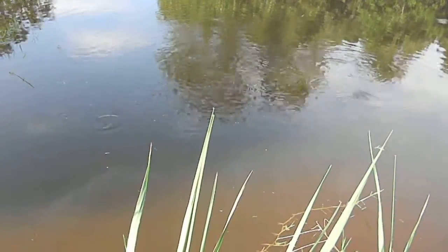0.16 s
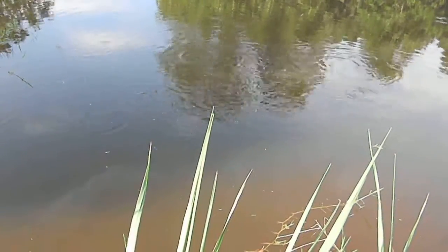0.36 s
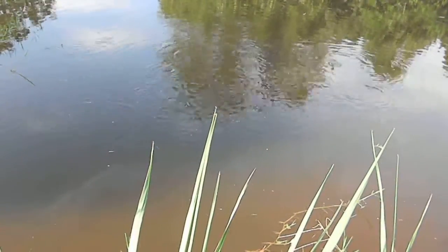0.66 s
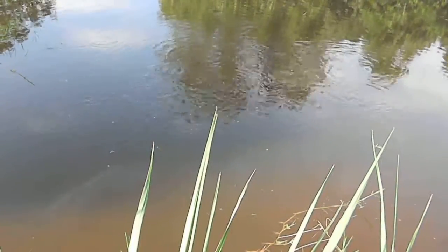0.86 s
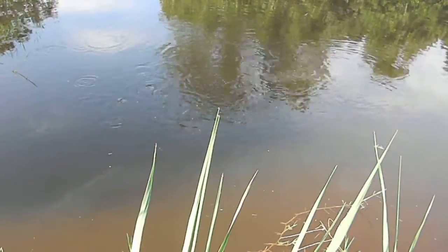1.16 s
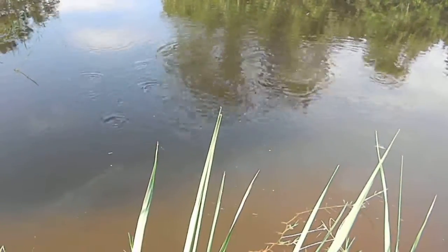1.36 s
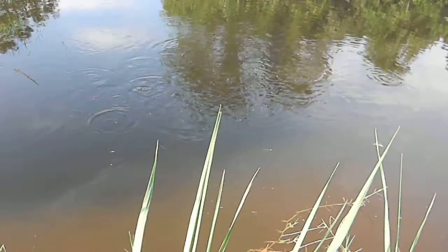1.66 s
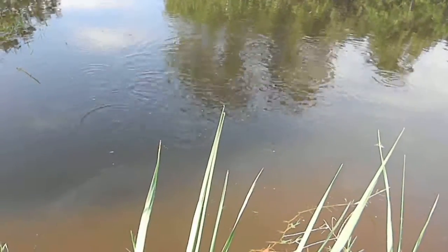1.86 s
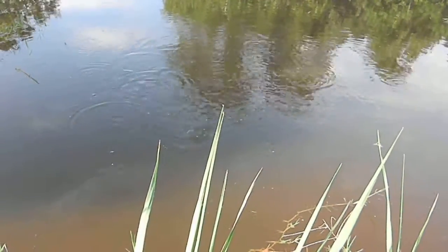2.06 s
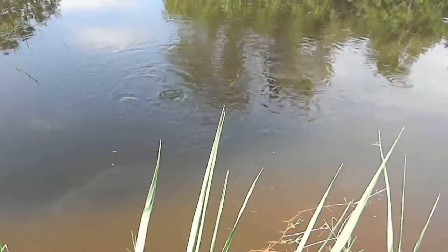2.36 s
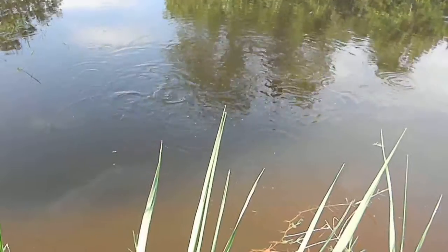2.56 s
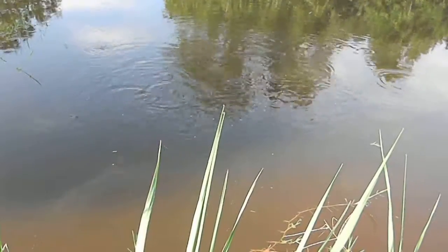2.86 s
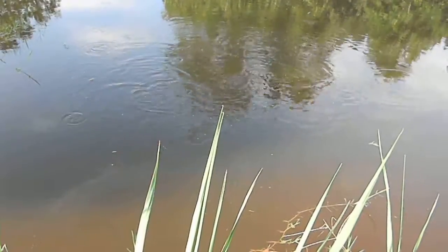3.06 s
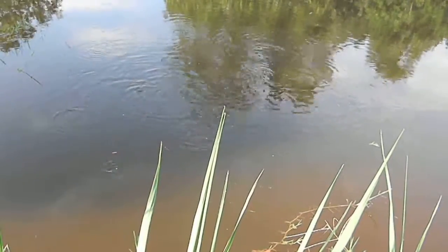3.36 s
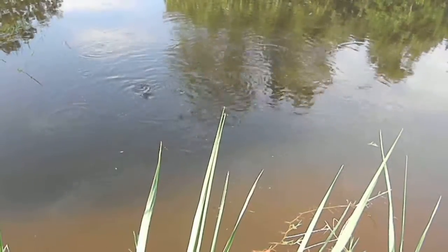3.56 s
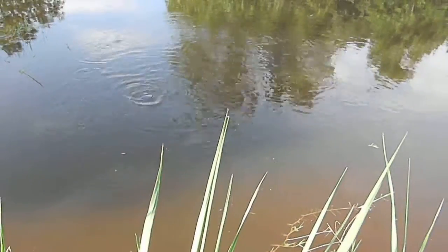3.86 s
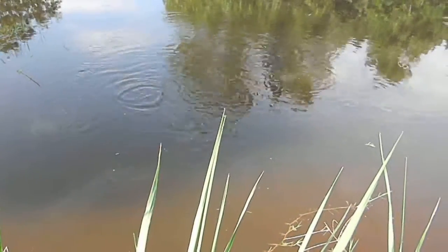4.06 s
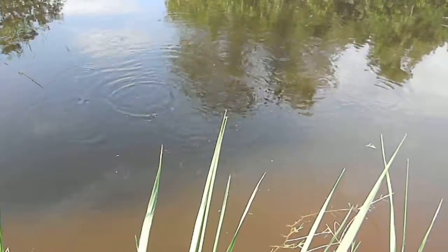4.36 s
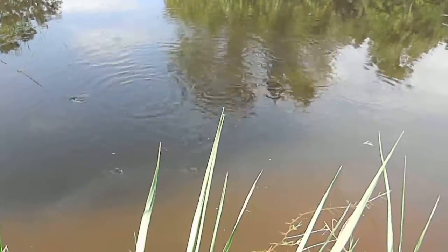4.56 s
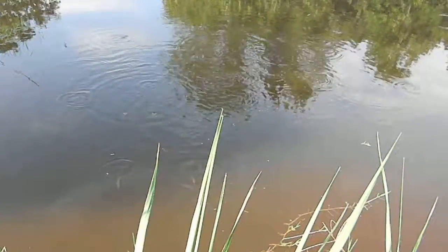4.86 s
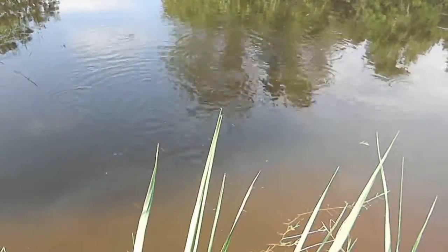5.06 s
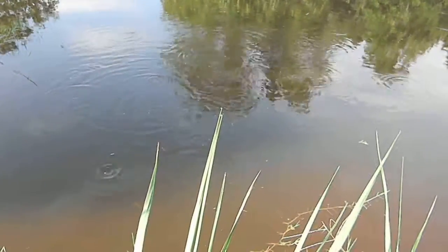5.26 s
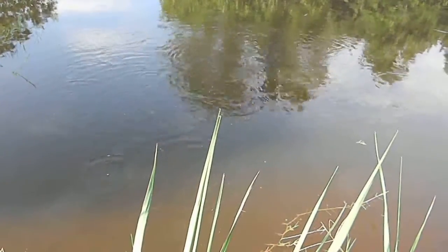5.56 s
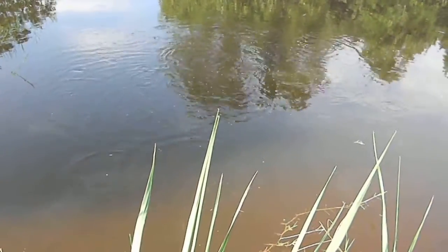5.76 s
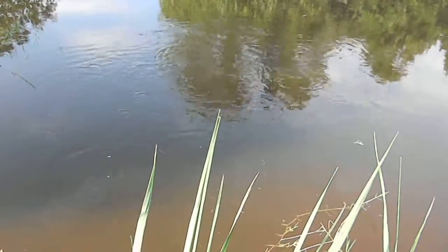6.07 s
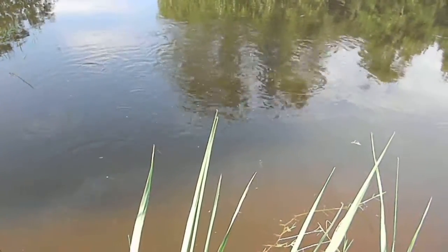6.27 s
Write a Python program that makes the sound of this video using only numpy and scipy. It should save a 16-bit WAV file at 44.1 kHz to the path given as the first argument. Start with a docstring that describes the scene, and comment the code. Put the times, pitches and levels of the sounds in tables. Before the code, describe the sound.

A steady high insect chorus over a low distant rumble, with short katydid zips, a few bird whistles and one small knock.

```python
"""A dense insect chorus hisses over a low far rumble, on a pond bank on a still summer day.
The insects sing by stridulation, a scraper drawn over a wing file: crickets throb in the distance,
while nearer katydids buzz, tick and rasp out short zips. A far bird gives rising whistles and a few
twitters, and something knocks once by the water. Reeds and trees scatter the short sounds."""
import sys
import numpy as np
from scipy import signal
from scipy.fft import rfft, irfft
from scipy.io import wavfile

SR = 44100
rng = np.random.default_rng(int(sys.argv[2]) if len(sys.argv) > 2 else 0)


def store_pcm(level_fs):
    """Save levels as 16-bit WAV."""
    pcm = np.round(np.clip(level_fs, -1, 1) * 32767).astype(np.int16)
    wavfile.write(sys.argv[1], SR, np.atleast_2d(pcm).T)


N = 282681
T = np.arange(N) / SR


# Spectrum of the massed insects: f/Hz, relative level/dB
CHORUS_SPECTRUM = [(2000, -26), (2400, -21), (3050, -5), (3950, -3.5), (4550, -12), (5500, -2), (6150, -4),
                   (6650, -5.5), (7400, 1.5), (8300, 0), (10400, -12), (12900, -12), (14300, -16),
                   (15800, -22)]

def chorus(level_db=-47, flicker_db=0.39):
    """Incoherent summation: countless far insects merge into a hiss."""
    return shaped_noise(CHORUS_SPECTRUM) * undb(level_db + flicker_db * drift(27))


# Cricket voices: f/Hz, bandwidth/Hz, pulse sharpness, initial level/dB, final level/dB
CRICKET_VOICES = [(2735, 67, 1.3, -70, -78), (3650, 75, 0.85, -60.5, -68), (4063, 75, 0.64, -68, -70),
                  (5580, 120, 3.4, -62.3, -63), (6985, 95, 6.6, -62.5, -61.5)]
# Their rhythms, in the same order: chirp rate/Hz, first chirp t/s
CRICKET_RHYTHMS = [(12.1, .038), (11.92, .051), (12.89, .001), (13.11, .076), (5.54, .005)]

def crickets():
    """Wing resonance: each far cricket throbs in a narrow band of its own."""
    out = np.zeros(N)
    for voice, (rate, first) in zip(CRICKET_VOICES, CRICKET_RHYTHMS):
        hz, width_hz, sharpness, initial_db, final_db = voice
        effort_db = np.linspace(initial_db, final_db, N) + 0.53 * drift(1)
        out += narrowband(hz, width_hz) * wingbeat(rate, sharpness, 0.05, first) * undb(effort_db)
    return out


# Spectrum of the rasp: f/Hz, relative level/dB
RASP_SPECTRUM = [(2450, -6), (2720, -0.5), (3450, 0.5), (4000, -2.5), (4600, -12), (5250, -1.5), (6100, 1),
                 (6600, -14)]
# Louder spells added to its soft song: start t/s, stop t/s, level/dB
RASP_SPELLS = [(.55, 1.3, -63), (1.9, 2.3, -66), (2.75, 4.15, -62.5)]

def rasping_insect(initial_rate_hz=11.47, quickening_hz_per_s=0.26, soft_db=-64.5):
    """Amplitude modulation: steadily quickening wing strokes pulse a broad friction noise."""
    mean_rate = initial_rate_hz + quickening_hz_per_s * T / 2
    rasp = shaped_noise(RASP_SPECTRUM) * wingbeat(mean_rate, sharpness=4, wander=0.048, first_s=0.021)
    spells = sum(undb(db) * swell(start, stop, 0.55, 0.46) for start, stop, db in RASP_SPELLS)
    return rasp * (undb(soft_db) + spells)


def trilling_insect(level_db=-54):
    """A sharp resonance, driven at the wingbeat rate: a nearly pure trill swells, then breaks off."""
    gain = undb(level_db) * swell(-1.2, 1.5, attack_s=1.7, release_s=0.28)
    return narrowband(hz=8700, width_hz=165) * wingbeat(58.2, sharpness=0.75, wander=0.072) * gain


# Zips of the nearest katydid: t/s, level/dB
ZIP_STROKES = [(.006, -41), (.843, -42.5), (1.654, -40.5), (2.416, -40), (2.977, -40), (3.486, -39),
               (4.016, -40.5), (4.538, -41), (5.287, -42), (5.775, -41.5)]
# Their spectrum: f/Hz, relative level/dB
ZIP_SPECTRUM = [(7200, -19), (8400, -11.5), (8750, -1), (9200, -6), (9600, -11), (10100, -5.5),
                (10900, -15.5), (12500, -12.5), (13200, -20), (13700, -12), (14400, -22), (15800, -19)]

def katydid_zips():
    """Stridulation: one pass over the file excites the wing's resonances in a short zip."""
    return file_strokes(ZIP_STROKES, ZIP_SPECTRUM, hold_s=0.015, tooth_hz=600, grit=0.23, tail_s=0.0018)


# Bouts of a second katydid: start t/s, stop t/s, level/dB
BUZZ_BOUTS = [(-.1, .7, -58), (.8, 1.56, -56.5), (1.74, 2.54, -56), (2.72, 3.6, -62)]
# Its spectrum: f/Hz, relative level/dB
BUZZ_SPECTRUM = [(9000, 0.5), (11000, -9), (11700, -4.5), (12700, -1), (13600, -12), (14400, -8),
                 (15800, -23)]

def katydid_buzz():
    """Roughness: wing strokes too fast to hear singly fuse into bouts of buzzing."""
    gain = sum(undb(db) * swell(start, stop, 0.098, 0.05) for start, stop, db in BUZZ_BOUTS)
    return shaped_noise(BUZZ_SPECTRUM) * wingbeat(51.3, sharpness=1, wander=0.14) * gain


# Soft ticks of the same katydid: t/s, level/dB
TICK_STROKES = [(.175, -50), (.707, -47), (1.733, -49), (2.222, -48), (2.299, -49), (2.636, -51),
                (3.076, -49), (3.32, -50), (5.548, -54)]

def katydid_ticks():
    """Transient excitation: lone strokes sound the same wing resonances as the buzz."""
    return file_strokes(TICK_STROKES, BUZZ_SPECTRUM,
                        hold_s=0.0094, tooth_hz=790, grit=0.46, tail_s=0.0015)


# Spectrum of a very high katydid: f/Hz, relative level/dB
HIGH_SPECTRUM = [(9500, -20), (11500, -14.5), (13000, -13), (14000, -15), (14800, -13), (15060, -1),
                 (15400, -9), (15800, -5)]

def high_katydid_buzz(level_db=-51.5):
    """Friction noise modulated by the wingbeat: a thin buzz swells slowly and stops dead."""
    gain = undb(level_db) * swell(2.3, 5.29, attack_s=1.95, release_s=0.02)
    return shaped_noise(HIGH_SPECTRUM) * wingbeat(63.9, sharpness=2.1, wander=0.18) * gain


def high_katydid_strokes(start_s=5.88, rate_hz=18.05, rise_s=0.16):
    """A periodic pulse train: the high katydid starts again with single strokes that grow louder."""
    times = np.arange(start_s, T[-1], 1 / rate_hz)
    levels_db = np.interp(times - start_s, [0, rise_s], [-59, -51])
    return file_strokes(zip(times, levels_db), HIGH_SPECTRUM,
                        hold_s=0.005, tooth_hz=900, grit=0.3, tail_s=0.0012)


# Bird notes: t/s, duration/s, first f/Hz, last f/Hz, level/dB, roughness (0-1)
BIRD_NOTES = [(2.185, 0.083, 2300, 3390, -55, 0.25), (2.252, .12, 3500, 4440, -51, 0.18),
              (5.772, 0.17, 3500, 4430, -49.5, 0.27), (5.962, .031, 2900, 3140, -51.5, .5),
              (6.03, 0.045, 4150, 3970, -54, 0.3), (6.097, .045, 2330, 2310, -55.5, 0.2),
              (6.126, .023, 2550, 2730, -51, 0.17), (6.21, 0.051, 2850, 3130, -49.5, 0.5),
              (6.277, .033, 3900, 4150, -52, 0.35), (6.345, 0.055, 2350, 2300, -55, .45),
              (6.355, 0.057, 2600, 2700, -58, 0.15)]

def bird():
    """Frequency modulation: whistles glide ever more slowly and fade; pitch flutter makes some hoarse."""
    out, flutter = np.zeros(N + SR), drift(250)
    for start, duration, first_hz, last_hz, db, roughness in BIRD_NOTES:
        progress = np.linspace(0, 1, int(duration * SR))
        glide_hz = first_hz + (last_hz - first_hz) * progress * (1.4 - 0.4 * progress)
        hz = glide_hz * (1 + 0.08 * roughness * flutter[:len(progress)])
        envelope = np.sqrt(np.abs(np.sin(np.pi * progress))) * (1.45 - 0.9 * progress)
        i = int(start * SR)
        out[i:i + len(hz)] += undb(db) * envelope * np.sin(2 * np.pi * np.cumsum(hz) / SR)
    return scatter(out[:N], wet_db=-6, t60=0.3)


# The knock and its small rebound: t/s, level/dB
KNOCK_IMPACTS = [(3.5626, -40.5), (3.5670, -53)]
# Modes of the struck body: f/Hz, relative level/dB, T60/s
STRUCK_MODES = [(1860, -4, 0.0073), (2050, -2.5, .022), (2350, -2, .006)]

def knock(attack_s=0.00049):
    """Damped free vibration: a small hard impact excites modes that die away quickly."""
    out, t = np.zeros(N), T[:SR // 20]
    ring = sum(undb(db) * np.sin(2 * np.pi * hz * t) * decay(t, t60) for hz, db, t60 in STRUCK_MODES)
    for start, db in KNOCK_IMPACTS:
        i = int(start * SR)
        out[i:i + len(t)] += undb(db) * ring * np.minimum(t / attack_s, 1)
    return scatter(out, wet_db=-7, t60=0.2)


# Spectrum of the far background: f/Hz, relative level/dB
RUMBLE_SPECTRUM = [(12, -52), (20, -16.5), (66, -1), (99, 0.5), (140, -3.5), (211, -8.5), (337, -22.5),
                   (517, -23), (666, -28), (857, -26), (1020, -32.5), (1340, -35.5), (2100, -38),
                   (2730, -29), (4620, -120)]

def rumble(level_db=-41, wander_db=0.55, crossover_hz=260):
    """Ambient noise in two bands: the low rumble wanders a little, the air above it stays even."""
    noise = shaped_noise(RUMBLE_SPECTRUM)
    low = signal.sosfiltfilt(signal.butter(2, crossover_hz, fs=SR, output="sos"), noise)
    air = noise - low
    return low * undb(level_db + wander_db * drift(0.73)) + air * undb(level_db)


def file_strokes(strokes, spectrum, hold_s, tooth_hz, grit, tail_s):
    """Source and filter: file teeth pulse a noise burst at a random rate near tooth_hz; wings shape it."""
    out, t = np.zeros(N), T[:SR // 16]
    envelope = np.exp(-np.maximum(t - hold_s, 0) / tail_s)
    for start, db in strokes:
        teeth = np.exp(grit * np.cos(2 * np.pi * tooth_hz * rng.uniform(0.69, 1.175) * t))
        stroke = envelope * unit_rms(teeth) * rng.standard_normal(len(t))
        i = max(int(start * SR), 0)
        out[i:i + len(t)] += undb(db) * stroke[:N - i]
    return shape(out, spectrum)


def wingbeat(rate_hz, sharpness, wander, first_s=0):
    """Quasi-periodic envelope: one scrape a cycle, the phase drifting by `wander` cycles rms."""
    cycles = rate_hz * (T - first_s) + wander * drift(1.7)
    return unit_rms(np.exp(sharpness * np.cos(2 * np.pi * cycles) / 2))


def swell(start, stop, attack_s, release_s):
    """Trapezoidal envelope: a spell of song rises from the start, holds, and fades after the stop."""
    return np.clip((T - start) / attack_s, 0, 1) * np.clip(1 - (T - stop) / release_s, 0, 1)


def scatter(x, wet_db, t60):
    """Diffuse reflection: reeds and trees add a thin tail to the direct sound."""
    t = T[:SR // 2]
    tail = rng.standard_normal(len(t)) * decay(t, t60)
    return x + undb(wet_db) * signal.fftconvolve(x, tail / np.linalg.norm(tail))[:N]


def narrowband(hz, width_hz):
    """Multipath blurring: a tone becomes noise within one resonance."""
    f = np.arange(N // 2 + 1) * SR / N
    resonance = 1 / (1 + ((f - hz) / (width_hz / 2)) ** 2)
    return unit_rms(irfft(rfft(rng.standard_normal(N)) * resonance, N))


def shape(x, spectrum):
    """Linear filtering by a spectrum with steep skirts; white input keeps its power."""
    hz, db = np.transpose(spectrum)
    f = np.maximum(np.arange(N // 2 + 1) * SR / N, 1)
    skirts = np.minimum(f / hz[0], 1) ** 6 * np.minimum(hz[-1] / f, 1) ** 6
    response = undb(np.interp(np.log(f), np.log(hz), db)) * skirts
    return irfft(rfft(x) * unit_rms(response), N)


def shaped_noise(spectrum):
    """Gaussian noise with the given spectrum and about unit power."""
    return shape(rng.standard_normal(N), spectrum)


def drift(rate_hz):
    """Low-pass random process of rms 1, changing about rate_hz times a second."""
    f = np.arange(N // 2 + 1) * SR / N
    return unit_rms(irfft(rfft(rng.standard_normal(N)) * np.exp(-(f / rate_hz) ** 2) * (f > 0), N))


def decay(t, t60):
    """Exponential damping, 60 dB in t60 seconds."""
    return np.exp(-np.log(1000) * t / t60)


def undb(db):
    """Level in decibels to amplitude ratio."""
    return 10 ** (np.asarray(db) / 20)


def unit_rms(x):
    """Normalisation to rms 1."""
    return x / np.sqrt(np.mean(x ** 2) + 1e-20)


def scene():
    """Superposition: all sources add at one point, the same in both channels."""
    distant = rumble() + chorus() + crickets() + rasping_insect()
    buzzes = trilling_insect() + katydid_buzz() + high_katydid_buzz()
    strokes = katydid_zips() + katydid_ticks() + high_katydid_strokes()
    mono = distant + buzzes + scatter(strokes, wet_db=-16, t60=0.085) + bird() + knock()
    return np.array([mono, mono])


def record(dry):
    """Band limiting: a steep low-pass filter removes the highest treble."""
    cutoff_hz = 15740
    return signal.sosfiltfilt(signal.ellip(12, 0.05, 60, cutoff_hz, fs=SR, output="sos"), dry)


dry = scene()
out = record(dry)
store_pcm(out)
```